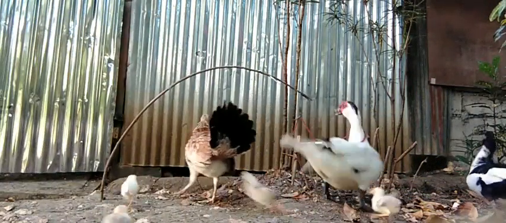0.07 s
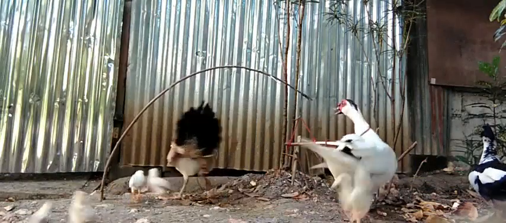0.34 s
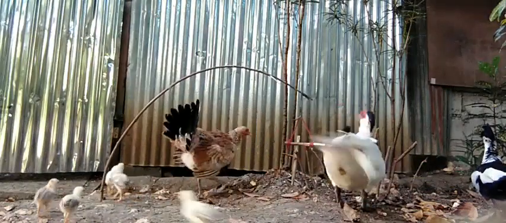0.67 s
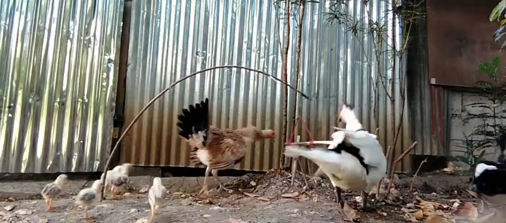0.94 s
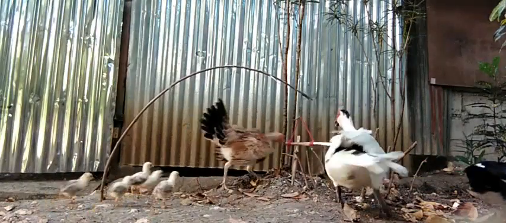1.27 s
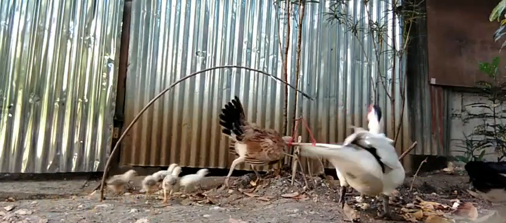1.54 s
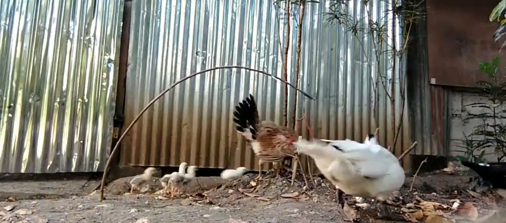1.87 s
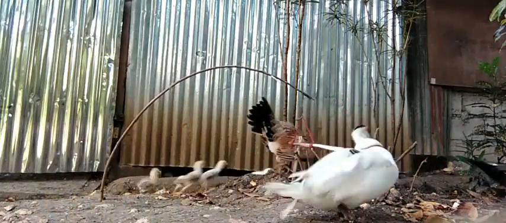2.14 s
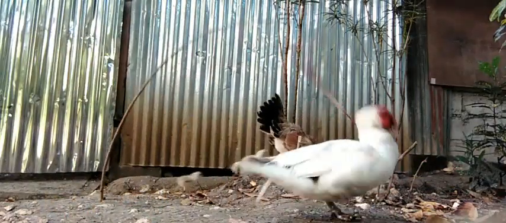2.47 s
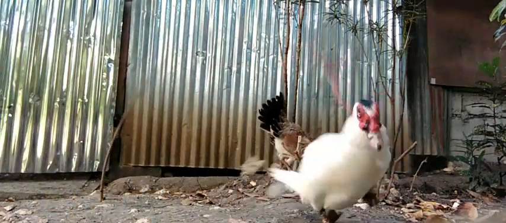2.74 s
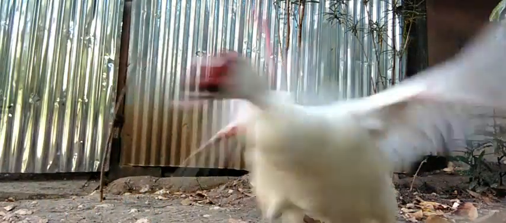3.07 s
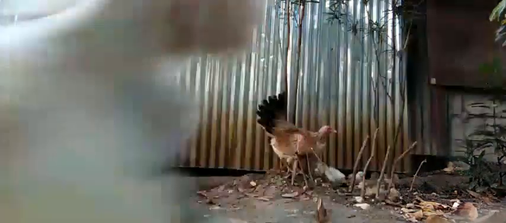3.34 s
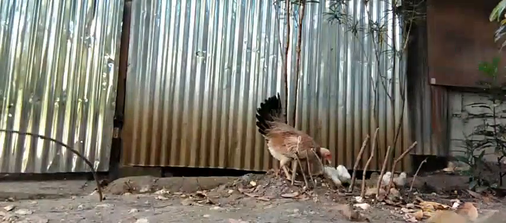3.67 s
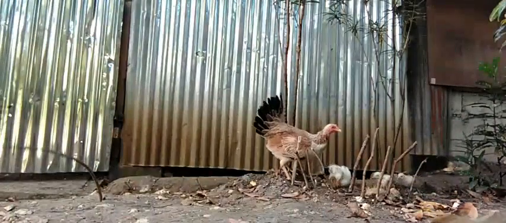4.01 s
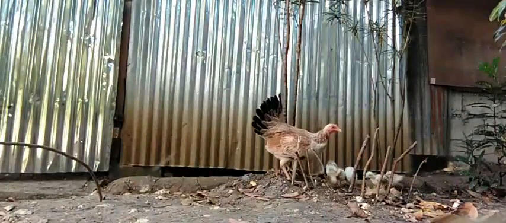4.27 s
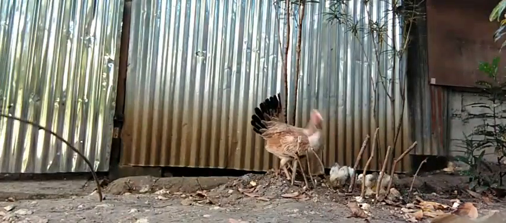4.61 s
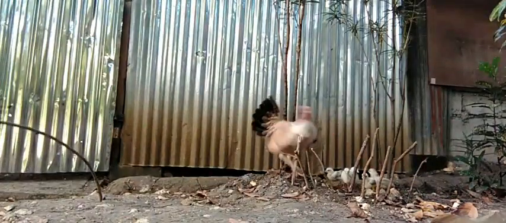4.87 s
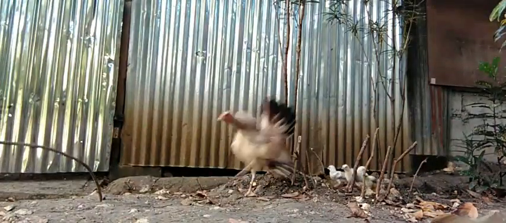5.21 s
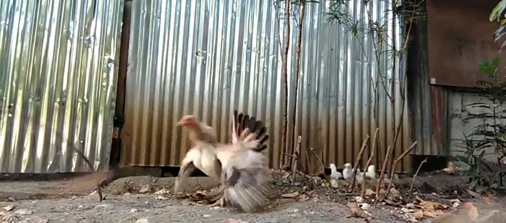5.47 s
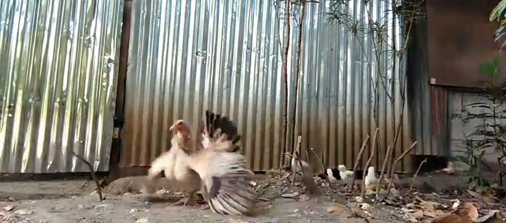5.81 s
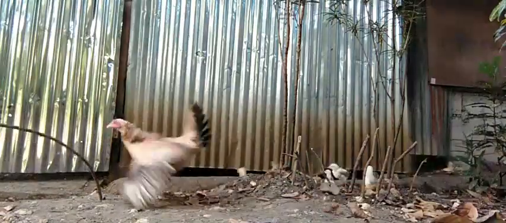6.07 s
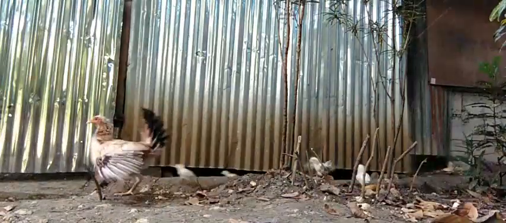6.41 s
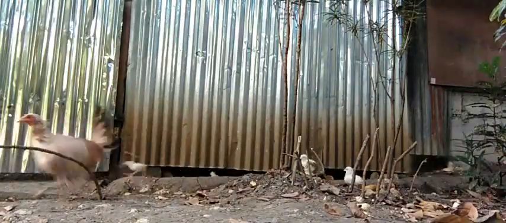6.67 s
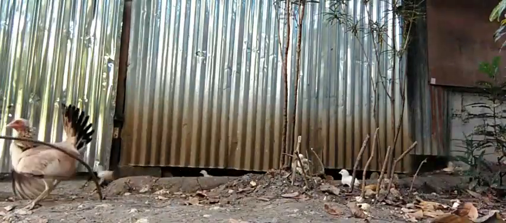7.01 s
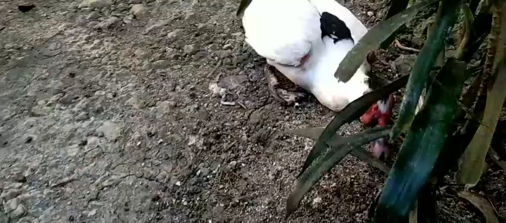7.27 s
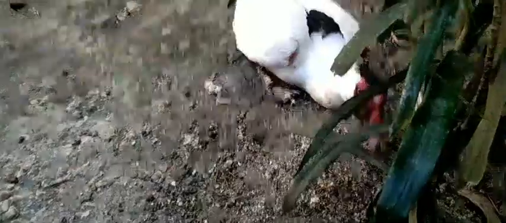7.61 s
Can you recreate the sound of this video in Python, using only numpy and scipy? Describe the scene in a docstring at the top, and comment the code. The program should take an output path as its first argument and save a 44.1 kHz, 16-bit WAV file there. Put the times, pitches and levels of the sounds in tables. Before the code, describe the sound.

A hen clucks, then squawks and beats her wings on the dirt as twigs crack, with chicks peeping and a duck hissing.

```python
"""Snared hen in a yard

Close to the microphone, by a sheet-metal fence, a hen clucks; caught in a ground snare, she squawks and
beats her wings on the dirt, and quills, twigs and dry leaves crack. A duck hisses nearby and runs off.
Farther out, chicks peep, a small bird chirps and distant fowl call, with more of the fence's echo.
Near the end the sound cuts briefly to silence and returns on another call, with a soft handling bump."""
import sys
import numpy as np
from scipy import signal
from scipy.fft import rfft, irfft, next_fast_len
from scipy.io import wavfile
from scipy.ndimage import uniform_filter1d, map_coordinates

SR = 44100
rng = np.random.default_rng(int(sys.argv[2]) if len(sys.argv) > 2 else 0)


def int16_out(signal):
    """Quantize to a 16-bit WAV file."""
    q = np.round(np.clip(np.atleast_2d(signal).T, -1, 1) * 32767)
    wavfile.write(sys.argv[1], SR, q.astype(np.int16))


N = 346185
T = np.arange(N) / SR

# Levels are relative within each table.
# the hen's double clucks: (time [s], low pitch [Hz], delay to the stressed note [s],
# pause before it [s], level [dB], stressed level [dB])
HEN_CLUCKS = [(.554, 419, .068, 0.011, -33.5, -29.5), (1.213, 431.5, .08, .011, -35.5, -33.5),
              (1.943, 489.6, .085, -0.0077, -35, -32)]
# her short notes: (time [s], length [s], pitch [Hz], level [dB], roughness [0-1], throat resonance [Hz],
# harsh edge [dB])
HEN_NOTES = [(2.486, 0.023, 842, -36.5, 0.14, 854, 12), (2.777, 0.019, 873, -34, 0.1, 810, 0),
             (3.76, 0.041, 643, -34.5, 0.23, 875, 16), (4.622, .038, 403, -39, 0.88, 740, 14),
             (4.802, 0.033, 600, -36, 0.11, 1250, 2), (4.948, 0.057, 664, -31, 0.52, 1370, 16),
             (5.186, 0.057, 473, -39.5, 0.88, 830, 0), (7.501, .052, 507, -40.5, .4, 1000, 26),
             (7.542, 0.042, 527.6, -36, 0.86, 980, 19.5)]
# her squawks: (time [s], length [s], start pitch [Hz], level [dB], loss of effort [dB])
HEN_SQUAWKS = [(-.02, 0.17, 597.6, -38.5, 11), (5.966, .2, 662, -32.5, 13), (6.571, 0.148, 599.6, -33, 2.5),
               (7.248, 0.17, 589.6, -33, 1.5)]
# colour of her throat: (frequency [Hz], gain [dB])
THROAT_COLOUR = [(150, -20), (300, 4), (450, 2.5), (800, 2), (1300, -1.5), (1480, -4.5), (1750, -10.5),
                 (2250, -8), (3200, -11), (6000, -19.5), (8400, -16), (12000, -14)]
# wing strokes: (time [s], hold [s], level [dB], treble [dB])
WING_STROKES = [(3.207, 0.071, -44, -16), (3.334, 0.017, -40, -14), (3.396, 0.0039, -44, 0),
                (3.475, 0.0068, -43, -15), (4.71, 0.097, -37.5, 8.5), (4.991, 0.03, -33, 4),
                (5.276, 0.076, -33.5, 2.5), (5.556, 0.067, -31.5, 6), (5.797, 0.018, -32, 3),
                (6.078, 0.036, -36, -2), (6.214, 0.06, -41.5, -1), (6.339, 0.0071, -36, 6),
                (6.449, 0.08, -45, 3.5), (6.54, 0.023, -38.5, 4.5), (6.823, 0.017, -32.5, -1.5),
                (6.931, 0.01, -37.5, 12), (7.176, 0.0054, -32.5, 2), (7.211, .008, -42, -1)]
# scrapes of a claw or wing tip: (time [s], level [dB])
CLAW_SCRAPES = [(2.122, -43.5), (2.375, -46), (3.162, -34.5), (3.874, -42.5), (3.98, -43.5), (4.005, -41.5),
                (4.559, -41.5), (5.315, -23.5), (5.666, -38), (6.341, -29.5), (7.105, -38.5)]
# air pushed by a wing or foot: (time [s], level [dB], frequency [Hz], t60 [s])
AIR_THUMPS = [(3.192, -25, 130, 0.039), (3.792, -24, 193, 0.018), (4.198, -25.5, 160, 0.021),
              (5.341, -10, 131.8, 0.044), (5.617, -6.5, 160, 0.018), (6.464, -23, 177, 0.032),
              (6.528, -16.5, 216, 0.026), (6.831, -30, 247, 0.058), (7.06, -16, 133, 0.012),
              (7.173, -19, 169, 0.043)]
# feathers on dirt: (frequency [Hz], level [dB])
FEATHER_SPECTRUM = [(100, -7), (300, 4.5), (800, 5), (1700, -1.5), (2600, -4), (4000, -5.5), (8000, -16),
                    (15500, -4)]
# buffets of air and dull bumps: (frequency [Hz], level [dB])
AIR_SPECTRUM = [(30, -42), (50, -37), (70, 1.5), (130, 2), (290, 1.5), (500, -13), (1200, -39.5),
                (4000, -89)]
# quills and twigs cracking: (time [s], level [dB], body [dB])
TWIG_CRACKS = [(2.37, -32.5, -7), (3.158, -20.5, -5), (3.204, -24, 1), (3.332, -29.5, 2),
               (3.354, -7.5, -23.5), (3.661, -23, -39), (3.689, -21.5, -53), (4.07, -28, -10.5),
               (4.689, -18, -28), (4.707, -14.5, -18), (4.775, -10.5, -21), (5.302, -10.5, -11),
               (5.549, -20, 0), (5.586, -9.5, -10.5), (5.616, -12.5, -5), (5.785, -17.5, -13),
               (5.817, -7, -16), (5.818, -4.5, -13.5), (5.909, -24, -5), (6.077, -15, -24),
               (6.398, -17, -20), (6.555, -16.5, -29), (6.752, -24.5, -20), (6.829, -9.5, -3.5),
               (7.177, -4, -13.5), (7.179, -5.5, -39), (7.19, -13, -21)]
# colour of a crack: (frequency [Hz], gain [dB])
CRACK_COLOUR = [(100, -10), (400, 7), (1200, 4), (2500, 1.5), (4000, -3.5), (8000, -7.5), (15500, -4)]
# the duck's hisses: (time [s], hold [s], level [dB])
DUCK_HISSES = [(2.857, 0.1, -39.5), (3.067, .055, -43.5), (4.158, 0.049, -42)]
# breath through its bill: (frequency [Hz], level [dB])
BILL_SPECTRUM = [(400, -17.5), (700, -5), (1000, -3.5), (1350, 3), (1700, -4), (2300, -16), (3500, -10.5),
                 (4900, -10), (6300, -25.5), (8200, -24), (15000, -25)]
# the small bird's chirps: (time of the top [s], top pitch [Hz], lead-in [s], warble [s], level [dB])
BIRD_CHIRPS = [(0.199, 5980, .048, 0.054, -31), (0.318, 5260, .001, 0.021, -30.5)]
# the chicks' falling peeps: (time [s], start pitch [Hz], level [dB])
CHICK_PEEPS = [(0.407, 5320, -53), (.5, 2880, -54), (.725, 2760, -49), (.755, 4260, -52),
               (0.814, 5500, -50), (.934, 2680, -52), (1.103, 5480, -54), (1.136, 3180, -41),
               (1.408, 3000, -46.5), (1.456, 4440, -53), (1.562, 5320, -52.5), (1.627, 3253, -45),
               (1.754, 4630, -57), (1.82, 5300, -53), (1.824, 3290, -42.5)]
# their soft, flatter cheeps: (time [s], length [s], start pitch [Hz], end pitch [Hz], level [dB])
CHICK_CHEEPS = [(1.884, .06, 3270, 3550, -47.5), (3, 0.026, 3750, 3470, -53),
                (3.278, 0.05, 2640, 2680, -56), (3.545, 0.033, 2620, 2480, -51),
                (3.713, 0.034, 2860, 2490, -50), (4.102, .045, 2560, 2370, -53),
                (4.289, 0.054, 3540, 3510, -59), (4.457, .05, 3150, 3600, -54),
                (7.659, 0.032, 3830, 2930, -45.5), (7.772, 0.0516, 3970, 3030, -51.5)]
# fowl far away: (time [s], length [s], start pitch [Hz], end pitch [Hz], level [dB])
FOWL_CALLS = [(.28, 0.37, 1550, 1525, -61), (2.12, 0.15, 1650, 1584, -64), (3.25, 0.7, 1590, 1517, -60.5),
              (7.64, 0.194, 1605, 1647, -52), (7.78, 0.059, 1073, 944, -46)]
# feet in dry leaves, then a soft low handling bump at the end:
# (time [s], length [s], rustle [dB], thud [dB])
RUSTLES_AND_THUDS = [(2.603, 0.5, -60, -65.5), (3.206, 0.69, -49.5, -52.5), (4.467, .06, -49.5, -47),
                     (4.9, 0.57, -48.5, -52), (5.68, 0.77, -43.5, -47), (6.654, .25, -48, -53),
                     (7.147, 0.14, -51, -56.5), (7.59, 0.074, -58, -55)]
# dry leaves: (frequency [Hz], level [dB])
LEAF_SPECTRUM = [(300, -6.5), (900, 0), (1700, 1.5), (2500, -7.5), (3600, 1), (6000, -4.5), (9000, -10.5),
                 (15500, 4)]
# the yard's murmur: (frequency [Hz], level [dB])
YARD_SPECTRUM = [(150, -8.5), (380, -4.5), (570, -10), (850, -1), (1300, -7.5), (2000, -7), (3400, -11.5),
                 (5000, -7), (6000, -24.5), (7100, -17), (8500, -38), (15000, -33)]
# the low rumble under it: (frequency [Hz], level [dB])
RUMBLE_SPECTRUM = [(25, -41), (45, -22.5), (70, 0.5), (135, 0.5), (200, -10), (330, -15.5), (550, -40),
                   (1300, -77)]
# echo off the fence and walls: (frequency [Hz], t60 [s])
FENCE_DECAY = [(200, 0.4), (1200, 0.27), (5000, 0.26), (12000, 0.75)]
# the microphone's port resonance and roll-off: (frequency [Hz], gain [dB])
MIC_RESPONSE = [(5000, -0.5), (6300, 3), (7200, 6.5), (8100, 15), (9500, 4), (12000, -12.5), (15500, -29)]
# a brief cut to silence, after which the sound returns a little louder: (time [s], gain [dB])
CUT_GAIN = [(7.395, 0), (7.415, -15), (7.44, -33), (7.465, -60), (7.475, -8.5), (7.495, -7), (7.51, 3)]


def syllable(length, start_hz, end_hz, rough, throat_hz, fade_db=0, harsh_db=0, scoop=0,
             throat_width_hz=330, ramp_s=0.014):
    """The hen's syrinx pulses ring her throat; roughness adds uneven cycles and puffs of noise."""
    n = int(length * SR)
    t = np.arange(n) / SR
    glide = np.linspace(start_hz, end_hz, n) * (1 - scoop * np.exp(-t / 0.012))
    jitter = 1 + 0.0784 * rough * wobble(345, n)
    phase = 2 * np.pi * np.cumsum(glide * jitter) / SR
    pulses = unit(np.cos(np.arange(1, 21)[:, None] * phase).sum(0))
    puffs = unit(rng.standard_normal(n) * (1 + np.cos(phase)))
    flutter = amp(2 * rough * wobble(150, n))
    source = (np.sqrt(1 - rough) * pulses + np.sqrt(rough) * puffs) * flutter
    ramp = np.clip(np.minimum(t, length - t) / ramp_s, 0, 1)
    swell = np.sin(np.pi / 2 * ramp) * amp(-fade_db * t / length)

    def throat_db(hz):
        detuning = (hz - throat_hz ** 2 / (hz + 1)) / throat_width_hz
        harsh_edge = harsh_db / (1 + ((hz - 2280) / 180) ** 2)  # an upper resonance
        return along(THROAT_COLOUR, hz) - 10 * np.log10(1 + detuning ** 2) + harsh_edge
    return unit(coloured(np.pad(source * swell, (0, 512)), throat_db))


def hen_clucks(break_s=0.034, overlap_s=0.012, high_hz=703, stress_hz=556.7, rise=0.077, drop=0.0766):
    """A low rising note breaks up to a higher one, then a rough stressed note falls away."""
    out = np.zeros(N)
    for s, hz, delay_s, pause_s, db, stress_db in HEN_CLUCKS:
        low = syllable(break_s + overlap_s, hz * (1 - rise), hz * (1 + rise),
                       rough=0.47, throat_hz=720, scoop=0.2)
        high_s = delay_s - break_s + overlap_s - pause_s
        high = syllable(high_s, high_hz * (1 - rise), high_hz * (1 + rise),
                        rough=0.34, throat_hz=900, harsh_db=-15)
        stressed = syllable(0.0397, stress_hz * (1 + drop), stress_hz * (1 - drop),
                            rough=0.663, throat_hz=977, harsh_db=-12, ramp_s=0.011)
        add(out, s, amp(db - 3) * low)
        add(out, s + break_s - overlap_s / 2, amp(db) * high)
        add(out, s + delay_s, amp(stress_db) * stressed)
    return out


def hen_notes(rise=0.026):
    """Single short notes, each rising a little."""
    out = np.zeros(N)
    for s, length, hz, db, rough, throat_hz, harsh_db in HEN_NOTES:
        note = syllable(length, hz * (1 - rise), hz * (1 + rise), rough, throat_hz, harsh_db=harsh_db)
        add(out, s, amp(db) * note)
    return out


def hen_squawks(sag_hz_per_db=6.5):
    """Long rasps that sink as her effort fades; the throat is tuned to the second harmonic."""
    out = np.zeros(N)
    for s, length, hz, db, fade_db in HEN_SQUAWKS:
        end_hz = hz - sag_hz_per_db * fade_db
        rasp = syllable(length, hz, end_hz, rough=0.692, throat_hz=hz + end_hz, fade_db=fade_db,
                        scoop=0.1005, throat_width_hz=350, ramp_s=0.018)
        add(out, s, amp(db) * rasp)
    return out


def wings(lead_s=0.06):
    """A stroke is a swish with a low buffet of air, a scrape only a bright swish, a thump only air."""
    out, n = np.zeros(N), SR // 3
    t = np.arange(n) / SR
    for s, hold, db, treble_db in WING_STROKES:
        feathers = held(t - lead_s, rise=0.012, hold=hold, t60=0.28) * swish(n, treble_db)
        buffet = held(t - lead_s, rise=0.021, hold=hold, t60=0.091) * noise(n, AIR_SPECTRUM)
        add(out, s - lead_s, amp(db + 2.5) * (feathers + amp(-5) * buffet))
    for s, db in CLAW_SCRAPES:
        scrape = held(t - lead_s, rise=0.011, hold=0.0091, t60=0.08) * swish(n, treble_db=12)
        add(out, s - lead_s, amp(db) * scrape)
    for s, db, hz, t60 in AIR_THUMPS:
        envelope = amp(db - 60 * t / t60) * (1 - np.exp(-t / 0.001))
        add(out, s, envelope * np.sin(2 * np.pi * hz * t))
    return signal.sosfilt(signal.butter(3, 55, "highpass", fs=SR, output="sos"), out)


def swish(size, treble_db, flutter_db=2):
    """The grainy rush of feathers on dirt."""
    tilt = [(1000, 0.13), (5000, 0.75)]  # (frequency [Hz], share of the treble gain [0-1])
    spectrum = [(hz, db + treble_db * along(tilt, hz)) for hz, db in FEATHER_SPECTRUM]
    rush = shaped(grains(size, rate=1000, spread_db=4, share=0.61), spectrum)
    return rush * amp(flutter_db * wobble(163.6, size))


def cracks(splinter_db=-19, splinter_t60=0.026):
    """A quill or twig snaps: a sharp spike, then a few milliseconds of splintering."""
    out, t = np.zeros(N), np.arange(SR // 16) / SR
    body_tilt = [(1500, 0.84), (4000, 0.061)]  # (frequency [Hz], weight [0-1])
    for s, db, body_db in TWIG_CRACKS:
        burst = amp(splinter_db - 60 * t / splinter_t60) * rng.standard_normal(len(t))
        burst[0] = 1
        body = 0.96 * (body_db + 20)
        crack = coloured(burst, lambda hz: along(CRACK_COLOUR, hz) + body * along(body_tilt, hz))
        add(out, s + 0.0005, amp(db + 4) * crack / np.abs(crack).max())
    return out


def duck():
    """Voiceless hisses through the open bill, close by."""
    breath = sum(amp(db) * held(T - s, rise=0.1, hold=hold, t60=0.078) for s, hold, db in DUCK_HISSES)
    return breath * amp(2 * wobble(62, N)) * noise(N, BILL_SPECTRUM)


def songbird(climb_hz_per_s=18000, sink_hz_per_s=20000, warbles_per_s=43, warble_hz=1075):
    """A whistle that climbs, then warbles downward, thrown back once by the fence."""
    out, margin_s, echo_s = np.zeros(N), 0.036, 0.017
    for s, top_hz, lead_s, warble_s, db in BIRD_CHIRPS:
        t = np.arange(-lead_s - margin_s, warble_s + margin_s, 1 / SR)
        fall = sink_hz_per_s * t + warble_hz * (1 - np.cos(2 * np.pi * warbles_per_s * t))
        pitch = top_hz + 110 * wobble(502, len(t)) + np.where(t < 0, climb_hz_per_s * t, -fall)
        envelope = held(t + lead_s, rise=0.014, hold=lead_s + warble_s, t60=0.026)
        note = amp(db - 4) * envelope * tone(pitch, overtone_db=-23)
        add(out, s + t[0], note)
        add(out, s + t[0] + echo_s, amp(-8) * note)
    return out


def chicks(brood_db=-58, brood_s=2.1, fall_ratio=0.72):
    """Clear peeps and cheeps over the fainter brood, which falls quiet before the duck moves off."""
    brood = [(brood_s * when, 3000 + 2300 * high, brood_db + 4 * loud)
             for when, high, loud in rng.random(size=(24, 3))]
    # higher peeps last longer
    rows = [(s, 0.042 * (hz / 3060) ** 1.2, hz, hz * fall_ratio, db) for s, hz, db in CHICK_PEEPS + brood]
    peeps = whistles(rows, waver=0.023, overtone_db=-33, hook=0.3)
    return peeps + whistles(CHICK_CHEEPS, waver=0.012, overtone_db=-23)


def far_fowl():
    """Thin, wavering calls a long way from the microphone."""
    return whistles(FOWL_CALLS, waver=0.045, overtone_db=-12)


def whistles(rows, waver, overtone_db, hook=0, hook_s=0.0049):
    """Thin bird notes that glide, swell and fade; a hook starts them below their pitch."""
    out = np.zeros(N)
    for s, length, start_hz, end_hz, db in rows:
        n = int(length * SR)
        glide = np.geomspace(start_hz, end_hz, n) * (1 - hook * np.exp(-np.arange(n) / SR / hook_s))
        pitch = glide * (1 + waver * wobble(250.5, n))
        swell = np.sin(np.linspace(0, np.pi, n))
        add(out, s, amp(db - 3.5) * unit(swell * tone(pitch, overtone_db)))
    return out


def feet_and_handling():
    """Feet stir dry leaves and pad on the dirt; the last bout is a soft low handling bump."""
    bouts = np.array([held(T - s, rise=0.17, hold=length, t60=1) for s, length, *_ in RUSTLES_AND_THUDS])
    gains = amp(np.array(RUSTLES_AND_THUDS)[:, 2:]).T
    rustle, thud = gains @ bouts * amp(2.6 * wobble(25, N))
    leaves = shaped(grains(N, rate=300, spread_db=7.5, share=0.35), LEAF_SPECTRUM)
    return rustle * leaves + thud * noise(N, AIR_SPECTRUM)


def yard(murmur_db=-56, rumble_db=-54):
    """The steady murmur of the place over a low rumble."""
    murmur = amp(murmur_db + wobble(11, N)) * shaped(patchy(N, depth_db=5), YARD_SPECTRUM)
    return murmur + amp(rumble_db) * noise(N, RUMBLE_SPECTRUM)


def fence(x):
    """The short answer of the fence and walls, about 7 ms behind the direct sound."""
    hz, t, bands = signal.stft(rng.standard_normal(SR // 2), SR, nperseg=256)
    decay = amp(-60 * t / along(FENCE_DECAY, hz)[:, None])
    tail = signal.istft(bands * decay, SR, nperseg=256)[1]
    return signal.fftconvolve(x, np.pad(tail / np.linalg.norm(tail), (300, 0)))[:N]


def amp(db):
    """Decibels to gain."""
    return np.exp(np.asarray(db) * np.log(10) / 20)


def unit(x):
    """Scale to rms 1."""
    return x / np.sqrt(np.mean(x ** 2) + 1e-20)


def along(points, hz):
    """Read (frequency [Hz], value) points on a log frequency axis."""
    freqs, values = np.transpose(points)
    return np.interp(np.log(hz + 1), np.log(freqs + 1), values)


def add(track, s, x):
    """Mix x into the track at time s."""
    start = round(s * SR)
    x, start = x[max(-start, 0):], max(start, 0)
    track[start:start + len(x)] += x[:max(N - start, 0)]


def held(t, rise, hold, t60):
    """An envelope that climbs 20 dB per rise until t = 0, holds, then dies away; times in seconds."""
    return amp(np.minimum(0, np.minimum(20 * t / rise, -60 * (t - hold) / t60)))


def wobble(rate, size):
    """A smooth random curve, rate knots a second."""
    knots = rng.standard_normal(4096)
    return map_coordinates(knots, [np.arange(size) * rate / SR], mode="wrap")


def tone(pitch, overtone_db):
    """A sine and its octave following a pitch curve."""
    phase = 2 * np.pi * np.cumsum(pitch) / SR
    return np.sin(phase) + amp(overtone_db) * np.sin(2 * phase)


def coloured(x, gain_db):
    """x through a causal filter whose gain in dB is a function of frequency."""
    m = 2 * next_fast_len(len(x) // 2 + 2048)
    gain = amp(gain_db(np.fft.rfftfreq(m, 1 / SR)))
    cepstrum = irfft(np.log(gain + 1e-6))
    cepstrum[1:m // 2] *= 2  # fold onto positive time for minimum phase
    cepstrum[m // 2 + 1:] = 0
    return irfft(rfft(x, m) * np.exp(rfft(cepstrum)))[:len(x)]


def shaped(x, spectrum):
    """Give white x a spectrum, scaled to about rms 1 at the microphone's output."""
    filtered = coloured(x, lambda hz: along(spectrum, hz))
    hz = np.linspace(0, SR / 2, 2048)
    power = amp(along(spectrum, hz)) ** 2
    mic_power = power * amp(along(MIC_RESPONSE, hz)) ** 2
    return unit(filtered) * np.sqrt(power.sum() / mic_power.sum())


def noise(size, spectrum):
    """Smooth noise with the given spectrum."""
    return shaped(rng.standard_normal(size), spectrum)


def grains(size, rate, spread_db, share):
    """Tiny ticks of uneven size over smooth noise; share is their part of the power."""
    ticks = (rng.random(size) < rate / SR) * rng.choice([-1, 1], size)
    strength = amp(spread_db * np.minimum(rng.exponential(size=size), 3))
    return np.sqrt(share) * unit(ticks * strength) + np.sqrt(1 - share) * rng.standard_normal(size)


def patchy(size, depth_db):
    """Noise whose level drifts in patches of time and frequency."""
    bands = signal.stft(rng.standard_normal(size), nperseg=512)[2]
    drift = uniform_filter1d(rng.standard_normal(bands.shape), size=5, axis=0)
    drift = uniform_filter1d(drift, size=14, axis=1)
    return signal.istft(bands * amp(depth_db * unit(drift)), nperseg=512)[1][:size]


def scene():
    """The hen and the duck are near and dry; the birds farther out carry more echo."""
    near = hen_clucks() + hen_notes() + hen_squawks() + duck() + wings() + cracks()
    chirps = songbird()
    far = chicks() + far_fowl()
    echo = fence(amp(-13.5) * near + amp(-5.5) * chirps + amp(0.5) * far)
    return (near + chirps + far + echo + feet_and_handling() + yard())[None]


def record(dry):
    """A mono microphone's colour and the band limit; the sound cuts out briefly and returns louder."""
    m, top_hz = next_fast_len(N + SR // 4), 15700
    cut = amp(np.interp(T, *np.transpose(CUT_GAIN)))
    heard = coloured(dry[0], lambda hz: along(MIC_RESPONSE, hz)) * cut
    passband = np.fft.rfftfreq(m, 1 / SR) < top_hz
    return irfft(rfft(heard, m) * passband, m)[None, :N]


dry = scene()
out = record(dry)
int16_out(out)
```